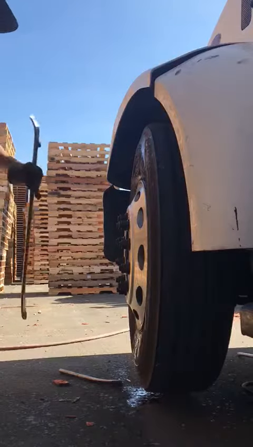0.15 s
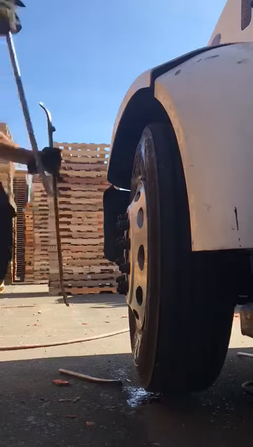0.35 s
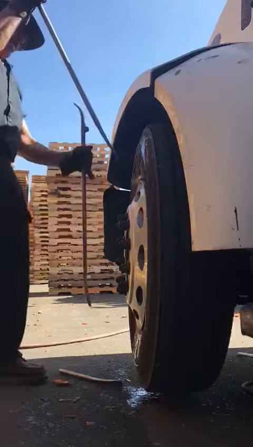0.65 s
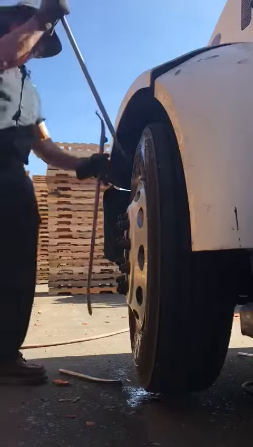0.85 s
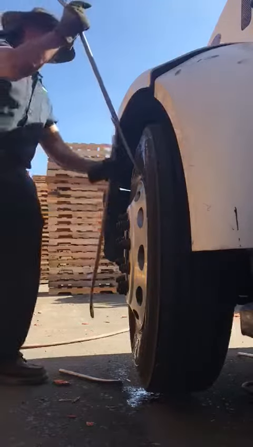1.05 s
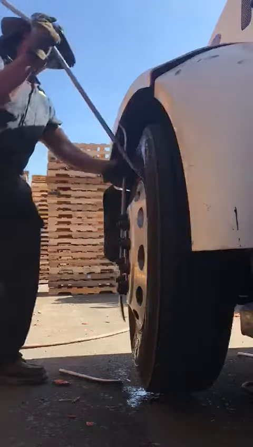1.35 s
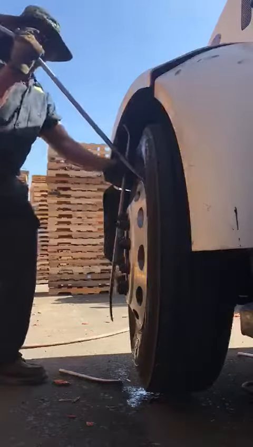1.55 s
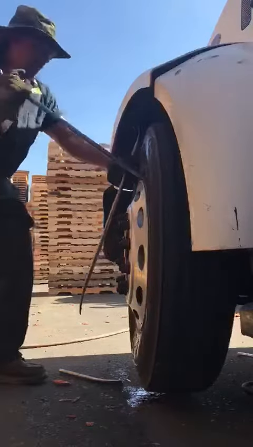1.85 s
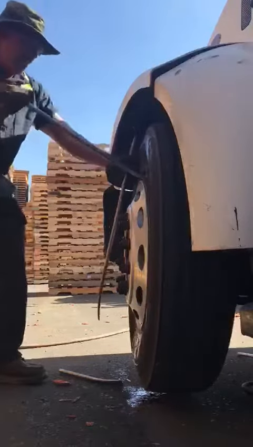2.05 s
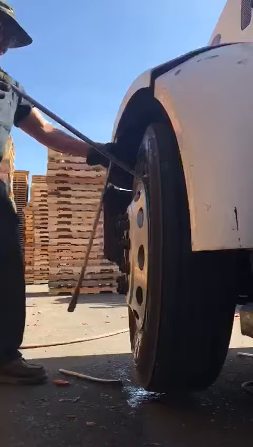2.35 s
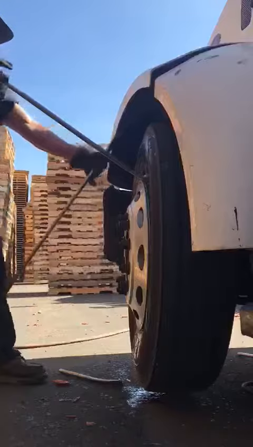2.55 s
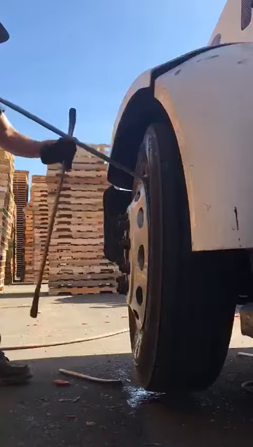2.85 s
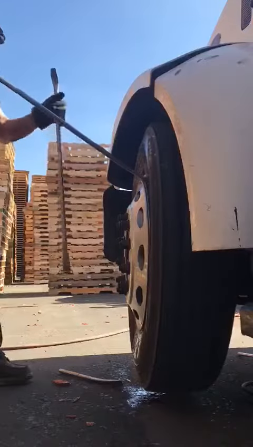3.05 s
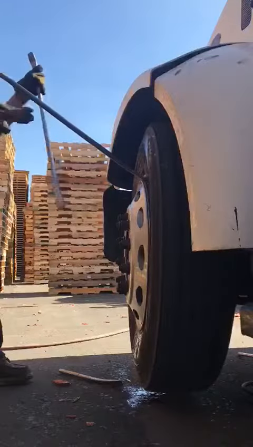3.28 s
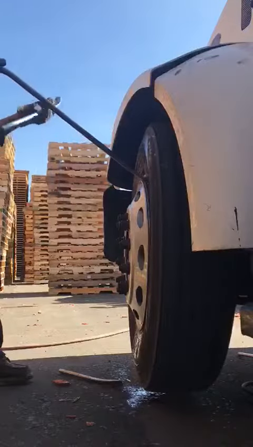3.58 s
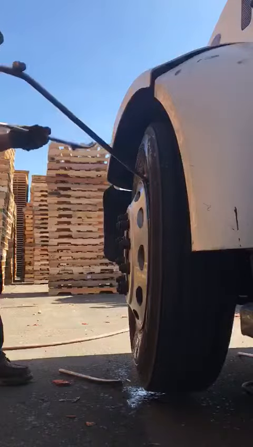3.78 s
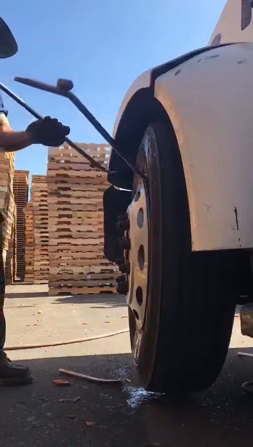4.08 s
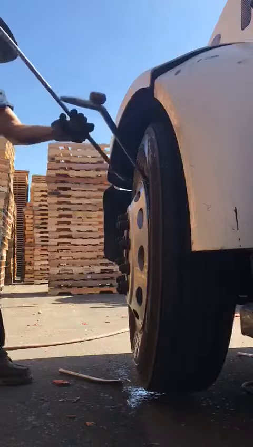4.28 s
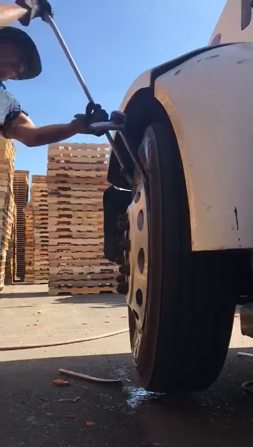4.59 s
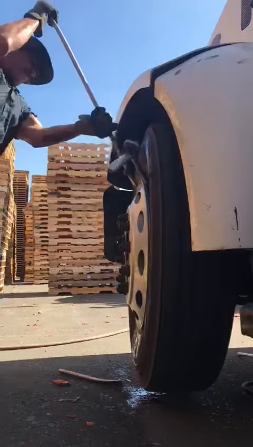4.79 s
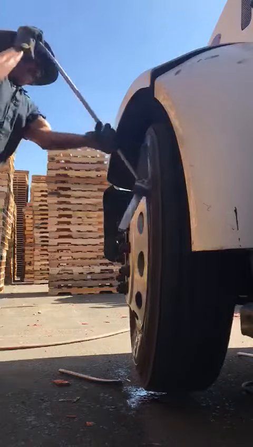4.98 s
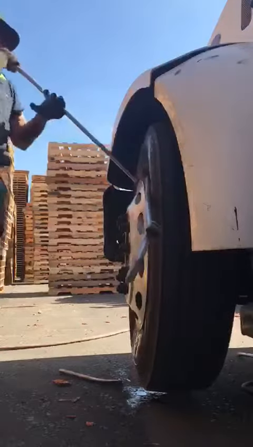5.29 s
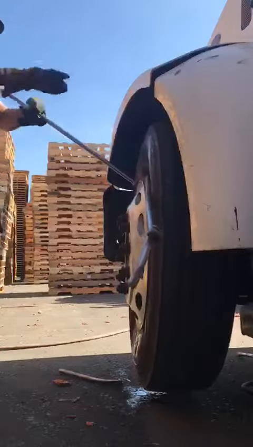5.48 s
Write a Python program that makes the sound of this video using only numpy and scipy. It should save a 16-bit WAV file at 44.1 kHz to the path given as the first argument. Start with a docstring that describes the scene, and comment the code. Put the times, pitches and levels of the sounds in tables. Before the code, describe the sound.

Steel bars slip and clank on a truck tyre's rim, with a loud rubbery boom as the bead pops, over low yard rumble.

```python
"""Workshop bay open to the yard: a truck tyre is levered off its rim with two long steel bars.
The rubber bead slips over the flange in jerks (shaped noise bursts) and the casing booms (ringing modes).
Bars clank on each other, a bar wedged in the rim is knocked (noise crash plus modes),
and bars scrape (friction driving resonances). Gloves slide and grit ticks (shaped noise);
a low rumble of steady noise fills the bay."""
import sys
import numpy as np
from scipy import signal
from scipy.io import wavfile

SR = 44100
rng = np.random.default_rng(int(sys.argv[2]) if len(sys.argv) > 2 else 0)


def log_audio(samples):
    """Write samples as a 16-bit WAV file to the path given in sys.argv[1]."""
    # one column per channel
    frames = np.atleast_2d(samples).T
    # limit to full scale, then quantise
    limited = np.clip(frames, -1, 1)
    pcm = np.round(limited * 32767).astype(np.int16)
    wavfile.write(sys.argv[1], SR, pcm)


N = 248249

# steady rumble of the yard: (frequency [Hz], density [dB per Hz, relative])
RUMBLE_SPECTRUM = [(13, -46), (22, -41), (49, -1.5), (70, -0.5), (87, -6), (202, -8), (422, -25),
                   (579, -29.5), (773, -33.5), (882, -34.5), (1900, -45.5), (4290, -55), (9220, -61),
                   (12000, -66.5), (15600, -106), (22000, -120)]
# gloves and sleeves: (frequency [Hz], density [dB per Hz, relative])
GLOVE_SPECTRUM = [(350, -34.5), (600, 5.5), (1040, -9), (1140, -3.5), (2180, -2.5), (5870, -5.5),
                  (9110, -8), (12000, -30.5), (15600, -65), (22000, -120)]
# steel sliding through gloves, sleeves swishing: (middle [s], level [dB], half length to 1/e [s])
SWISHES = [(0.091, -53, 0.0644), (0.303, -51.5, 0.0614), (.51, -56, 0.0447), (1.317, -56.5, 0.091),
           (1.884, -54, 0.081), (2.232, -60, 0.0613), (2.78, -62.5, 0.067), (3.073, -69, 0.027),
           (3.54, -63, 0.0856), (3.735, -56.5, 0.0596), (4.055, -60, .08), (4.3, -65, 0.45),
           (4.589, -59, 0.067), (5.28, -54, 0.0733), (5.522, -57.5, 0.181)]
# tips ticking, boots scuffing on grit: (time [s], level [dB], t60 [s])
TICKS = [(.236, -49.5, 0.374), (.282, -30, 0.0325), (.63, -46, 0.21), (0.65, -43, 0.076),
         (0.784, -42.5, 0.012), (.945, -27, 0.00586), (0.983, -49, 0.206), (1.041, -38.5, 0.062),
         (3.469, -48, 0.258), (5.499, -46, 0.197)]
# colour of ticks and scuffs: (frequency [Hz], density [dB per Hz, relative])
GRIT_SPECTRUM = [(150, 2), (600, -1), (1200, -7), (2200, -2.5), (5000, -3), (9000, -14.5), (12000, -8.5)]
# bar striking bar in single clanks: (time [s], level [dB], brightness [dB per octave], unused [s])
BAR_CLASHES = [(1.0425, -74.5, 8.5, 0), (1.174, -42, 4.5, 0), (4.4835, -27.5, -0.76, .021),
               (4.5065, -27.5, -0.35, .021), (4.5835, -45.5, -3.5, 0), (4.7945, -60.5, -4, 0)]
# wedged bar knocked: (time [s], level [dB], brightness [dB per octave], rattle length [s])
WEDGED_BAR_KNOCKS = [(1.532, -42, -28.5, 0), (1.981, -38, -9, 0.0197), (3.089, -40.5, -11, 0),
                     (3.165, -42.5, -20, 0.0097), (3.249, -49, -12, 0), (5.012, -30.5, -7, 0.0055),
                     (5.025, -26, 3, .1), (5.139, -39, -3.5, 0), (5.593, -32, -15, 0.014)]
# loaded flange pinging as the bar tip jumps: (time [s], level [dB], brightness [dB per octave])
PINGS = [(1.152, -45.5, 18.5), (1.173, -35, 17), (1.185, -16.5, -46.5), (1.983, -24.5, -10.5),
         (3.172, -41.5, -28.5)]
# ringing modes of the bar: (frequency [Hz], level [dB, relative], t60 [s])
BAR_MODES = [(917, 4.5, .09), (1077, -7, .08), (1538, 3, .12), (1730, -7, .15), (1968, 0, .12),
             (2155, -1, .09), (2416, -3, .15), (2681, -1, .1), (2807, -7, .12), (3683, -5, .11),
             (4110, -5, .14), (4718, -6, .13), (5631, -12, .15), (6304, -8, .11), (6490, -4, .11),
             (7442, -3, .13), (8177, -10, .1), (8769, -12, .1), (9173, -13, .11), (10230, -18, .1),
             (11160, -21, .09)]
# ringing modes of a bar wedged in the rim: (frequency [Hz], level [dB, relative], t60 [s])
WEDGED_BAR_MODES = [(882, -7, .16), (915, -5, .22), (990, -11, .3), (1517, 3, .17), (1563, 3, .17),
                    (1693, -11, .3), (1984, -4, .19), (2404, -7, .1), (2438, -3, .14), (2481, -1, .18),
                    (2977, -14, .2), (3099, -9, .1), (3137, 0, .12), (3208, -22, .9), (3325, -8, .14),
                    (3390, -11, .14), (3457, -5, .22), (3908, -3, .19), (4395, -18, .25), (4429, -7, .15),
                    (5050, -19, .15), (5792, -18, .15), (6613, -13, .16), (6800, -15, .15)]
# ringing modes of the flange: (frequency [Hz], level [dB, relative], t60 [s])
FLANGE_MODES = [(1990.7, -6.5, 0.176), (2480, -10, 0.27), (2611, -6, 0.152), (3620, -22.5, 0.26),
                (4223, -9.5, 0.0846), (6720, -18, 0.05), (8280, -22.5, 0.019)]
# dense overtones of steel: (frequency [Hz], density [dB per Hz, relative], t60 [s])
STEEL_OVERTONES = [(100, -24.5, 0.27), (360, -5, 0.141), (795, 5, 0.1266), (1200, -8, 0.217),
                   (1963, -0.5, 0.0713), (3200, -2, 0.201), (4700, -10.5, 0.16), (6700, -1.5, 0.0759),
                   (8920, -2, 0.0132), (11500, -21.5, 0.098)]
# bead slipping over the flange: (time [s], level [dB], brightness [dB per octave], build-up [s])
SLIPS = [(1.149, -27, 5, 0.00464), (1.17, -22.5, 17, 0.0024), (1.182, -20, -5.5, 0.0034),
         (1.284, -34.5, -6.5, .004), (1.328, -37, -3, 0.0088), (1.594, -24, -6, 0.00192),
         (2.249, -13.5, 3.5, 0.00325), (2.271, -26.5, 2, 0.0058), (2.318, -24.5, -5, 0.02),
         (2.398, -24, -0.44, 0.00676), (2.448, -45, 8, 0.00274), (2.558, -34.5, -3, 0.0487),
         (2.6, -25, -1, 0.0181), (2.768, -49.5, -1.5, .004)]
# bead popping free, a bright knock then a boom: (time [s], level [dB], brightness [dB per octave])
POPS = [(2.251, -35.5, 7), (2.267, -11.5, -1.5)]
# dense overtones of rubber: (frequency [Hz], density [dB per Hz, relative], t60 [s])
RUBBER_OVERTONES = [(78.7, -27, 0.1467), (201, -2, 0.566), (408, -2.5, 0.253), (708.3, 3, 0.2286),
                    (1130, -5, 0.2106), (2520, -5.5, 0.0983), (3860, -10, 0.1297), (7460, -21.5, 0.0676),
                    (11580, -40, 0.034)]
# ringing modes of the casing: (frequency [Hz], level [dB, relative], t60 [s])
CASING_MODES = [(74.5, -9, 1.1), (141, -7, .22), (157, 2, .45), (275, -12, .9), (367, -10, .6),
                (419, -16, .55), (487, -16, .6), (616, -10, .45), (712, -3, .22), (801, -13, .31),
                (1028, -21, .4), (1337, -21, .3)]
# bar dragged along the flange: (time [s], level [dB, before level_db of scrape()])
DRAG = [(1.74, -93.5), (1.764, -45), (1.866, -44.5), (1.878, -32), (1.932, -41.5), (1.96, -79.5)]
# broad resonances of the gripped bar: (frequency [Hz], level [dB, relative], t60 [s])
GRIPPED_RESONANCES = [(617.3, 4, 0.026), (893.5, 5.5, 0.088), (922, -4.5, 0.094), (1598, -2.5, 0.049),
                      (2495, -15.5, 0.113), (3345, -5.5, 0.032), (4570, -13, 0.031), (6194, 1, 0.01)]
# bar tip rasping under the bead: (time [s], level [dB, before level_db of scrape()])
RASP = [(5.35, -55.5), (5.356, -61.5), (5.414, -41), (5.558, -50.5), (5.58, -53.5)]
# resonances of the wedged bar as it rasps: (frequency [Hz], level [dB, relative], t60 [s])
RASP_RESONANCES = [(1087, -9.5, 0.065), (1680.4, 0, 0.082), (2276, 4, 0.031), (2640, 3, 0.024),
                   (2683, 11, 0.033), (3770, 5.5, 0.019), (4280, -7.5, 0.043), (6270, -2, 0.0089)]
# wheel rocking on its springs: (time [s], level [dB], brightness [dB per octave])
JOLTS = [(5.035, -21.5, 8), (5.145, -21.5, -34.5)]
# modes of the rocking wheel: (frequency [Hz], level [dB, relative], t60 [s])
WHEEL_MODES = [(48.19, -1.5, 0.744), (62.64, -12, 0.8), (84.7, 3.5, 0.099)]

TIME_S = np.arange(N) / SR
# half-octave noise bands
EDGES_HZ = 22 * 2 ** np.arange(0, 9.6, .5)
CENTRES_HZ = np.sqrt(EDGES_HZ[1:] * EDGES_HZ[:-1])

RUMBLE_DB, RUSTLE_DB = -36.5, -74
GRIT_DB_PER_OCTAVE = -1.5
# wavering of ringing modes
WAVER_DEPTH, WAVERS_PER_S = .55, 70
# each gap of a rattle over the one before; crash level per brightness (harder contacts crash more)
GAP_GROWTH, CRASH_DB_PER_DB_PER_OCTAVE = 1.6, 0.765
# casing kick re the slip; loss per brightness (duller slips kick harder)
BOOM_DB, BOOM_LOSS_DB_PER_DB_PER_OCTAVE = -11.5, .3
# softer, duller rub after each slip; level and brightness re the slip
SETTLE_DELAY_S, SETTLE_RISE_S, SETTLE_DB, SETTLE_DB_PER_OCTAVE = .025, .015, -20, -6
CUTOFF_HZ = 11700


def from_db(db):
    """Decibels to amplitude."""
    return 10 ** (np.asarray(db) / 20)


def rms_one(x):
    """Scale to rms 1."""
    return x / np.sqrt(np.mean(x ** 2) + 1e-20)


def level_curve(rows):
    """Gain in time from rows (time [s], level [dB]); silent outside them."""
    return from_db(np.interp(TIME_S, *np.transpose(rows), left=-200, right=-200))


def per_band(points, axis=1):
    """One column of a table over frequency, read at the band centres."""
    table = np.array(points)
    return np.interp(np.log(CENTRES_HZ), np.log(table[:, 0]), table[:, axis])


def noise_bands():
    """Half-octave bands of noise, rms 1 each; neighbours use separate noises."""
    white = rng.standard_normal((2, N))
    bands = []
    for k, edges_hz in enumerate(zip(EDGES_HZ, EDGES_HZ[1:])):
        band_pass = signal.butter(2, edges_hz, "band", fs=SR, output="sos")
        bands.append(rms_one(signal.sosfilt(band_pass, white[k % 2])))
    return np.array(bands)


def band_gains(spectrum, tilt=0):
    """Band gains for a spectrum tilted in dB per octave, total power 1."""
    density = from_db(per_band(spectrum) + tilt * np.log2(CENTRES_HZ))
    gains = density * np.sqrt(CENTRES_HZ)  # bandwidth grows with frequency
    return gains / np.linalg.norm(gains)


def burst(bands, start_s, gains, t60_s, rise_s):
    """Countless overtones swell and die, each band at its own pace; low bands take a cycle or so to build."""
    start, out = int(start_s * SR), np.zeros(N)
    length = min(int((np.max(t60_s) + rise_s) * SR), N - start)
    t = TIME_S[:length]
    build_s = np.reshape(rise_s + 1 / CENTRES_HZ, (-1, 1))
    decay = np.exp(-np.log(1000) * np.maximum(t - build_s, 0) / np.reshape(t60_s, (-1, 1)))
    shape = np.minimum(t / build_s, 1) * decay
    out[start:start + length] = gains @ (shape * bands[:, start:start + length])
    return out


def strike(hits, modes):
    """Hits (time, dB, tilt) pour energy into every mode; shifting contact makes each mode waver as it dies."""
    s, db, tilt = np.transpose(hits)[:3]
    lowest_hz, out = modes[0][0], np.zeros(N)
    steps_s = np.arange(0, N / SR + 1, 1 / WAVERS_PER_S)
    for hz, mode_db, t60_s in modes:
        blows = np.zeros(N)
        blows[(s * SR).astype(int)] = from_db(db + mode_db + tilt * np.log2(hz / lowest_hz)) ** 2
        loss = np.exp(-2 * np.log(1000) / (t60_s * SR))
        build = np.exp(-hz / SR)  # builds up in about a cycle
        energy = signal.lfilter([1 - build], [1, -loss - build, loss * build], blows + 1e-20)
        live = energy > 1e-10
        wander = rng.standard_normal((len(steps_s), 2)) @ [1, 1j]
        sway = 1 + WAVER_DEPTH * wander / np.sqrt(2)
        carrier = np.exp(2j * np.pi * (hz * TIME_S[live] + rng.random()))
        swing = np.interp(TIME_S[live], steps_s, sway) * carrier
        out[live] += np.sqrt(energy[live]) * swing.real
    return out


def yard_rumble():
    """Steady low-weighted noise."""
    return from_db(RUMBLE_DB) * (band_gains(RUMBLE_SPECTRUM) @ noise_bands())


def gloves(bands):
    """Sliding hiss swells and fades with each stroke, over a constant rustle of clothes."""
    sliding = from_db(RUSTLE_DB)
    for middle_s, db, half_s in SWISHES:
        sliding = sliding + from_db(db) * np.exp(-((TIME_S - middle_s) / half_s) ** 2)
    return sliding * (band_gains(GLOVE_SPECTRUM) @ bands)


def ticks_and_scuffs(bands):
    """Dry contacts on grit: noise bursts of one colour, each with its own decay."""
    gains = band_gains(GRIT_SPECTRUM, GRIT_DB_PER_OCTAVE)
    return sum(burst(bands, s, from_db(db) * gains, t60_s, 0) for s, db, t60_s in TICKS)


def contact(s, db, tilt, crash_db):
    """One contact (time, dB, tilt, crash dB); crash_db is the crash re the ring at zero tilt."""
    return s, db, tilt, db + crash_db + CRASH_DB_PER_DB_PER_OCTAVE * tilt


def rattle(blows, first_gap_s, fade_db_per_s, dulling_db_per_octave_per_s, crash_db):
    """Contacts at growing gaps, ever softer and duller, within each blow's rattle length."""
    gaps_s = first_gap_s * GAP_GROWTH ** np.arange(8)
    delays_s = np.concatenate([[0], np.cumsum(gaps_s)])
    contacts = []
    for s, blow_db, blow_tilt, length_s in blows:
        for delay_s in delays_s[delays_s <= length_s]:
            db = blow_db - fade_db_per_s * delay_s
            tilt = blow_tilt - dulling_db_per_octave_per_s * delay_s
            contacts.append(contact(s + delay_s, db, tilt, crash_db))
    return contacts


def clanks(bands):
    """Steel on steel: a short crash of overtones and ringing modes, damped by hands and rubber."""
    on_bar = [contact(s, db, tilt, crash_db=1) for s, db, tilt, _ in BAR_CLASHES]
    on_wedged_bar = rattle(WEDGED_BAR_KNOCKS, first_gap_s=.0051, fade_db_per_s=23.4,
                           dulling_db_per_octave_per_s=195, crash_db=1.56)
    t60_s = per_band(STEEL_OVERTONES, axis=2)
    crash = np.zeros(N)
    for s, _, tilt, crash_db in on_wedged_bar + on_bar:
        gains = from_db(crash_db) * band_gains(STEEL_OVERTONES, tilt / 2)
        crash += burst(bands, s, gains, t60_s, 0)
    rings = strike(on_wedged_bar, WEDGED_BAR_MODES) + strike(on_bar, BAR_MODES)
    return crash + rings + strike(PINGS, FLANGE_MODES)


def tyre(bands):
    """Each slip is a rough bark of rubber, settles with a softer rub and kicks the casing and its air."""
    settles, kicks = [], []
    for s, db, tilt, rise_s in SLIPS:
        settles.append((s + SETTLE_DELAY_S, db + SETTLE_DB, tilt + SETTLE_DB_PER_OCTAVE, SETTLE_RISE_S))
        kicks.append((s + rise_s, db + BOOM_DB - BOOM_LOSS_DB_PER_DB_PER_OCTAVE * tilt, 0))
    t60_s = per_band(RUBBER_OVERTONES, axis=2)
    bark = np.zeros(N)
    for s, db, tilt, rise_s in list(SLIPS) + settles:
        bark += burst(bands, s, from_db(db) * band_gains(RUBBER_OVERTONES, tilt), t60_s, rise_s)
    return bark + strike(kicks + list(POPS), CASING_MODES)


def friction(catches_per_s, spread_db):
    """Tiny catches of uneven size and either sign at random moments."""
    sizes = from_db(spread_db * np.minimum(rng.exponential(1, N), 4)) * rng.choice([-1, 1], N)
    return sizes * (rng.random(N) < catches_per_s / SR)


def ring(force, hz, t60_s):
    """Two-pole resonator: a unit click sets a sine of height 1 ringing."""
    r, w = from_db(-60 / (t60_s * SR)), 2 * np.pi * hz / SR
    return signal.lfilter([0, np.sin(w)], [1, -2 * r * np.cos(w), r * r], force + 1e-18)


def scrape(stroke, modes, level_db, catches_per_s, grit_db):
    """Friction excites the bar's resonances along the stroke and is also heard directly as grit."""
    force = friction(catches_per_s, spread_db=-3.5)
    rings = rms_one(sum(from_db(db) * ring(force, hz, t60_s) for hz, db, t60_s in modes))
    grit = from_db(grit_db) * rms_one(force)
    return from_db(level_db) * level_curve(stroke) * (rings + grit)


def wheel_jolts():
    """The wheel rocks on its springs: jolts ring its low modes."""
    return strike(JOLTS, WHEEL_MODES)


def reflections(x, t60_s, delay_s, dull_hz):
    """Diffuse echoes: decaying noise that starts after a delay, dulled by the surfaces."""
    t = TIME_S[:SR]
    tail = rng.standard_normal(SR) * np.exp(-np.log(1000) * t / t60_s) * (t > delay_s)
    tail /= np.linalg.norm(tail)
    tail = signal.sosfilt(signal.butter(1, dull_hz, fs=SR, output="sos"), tail)
    return signal.fftconvolve(x, tail)[:N]


def scene():
    """Work at the wheel, its echoes in wheel arch and bay, jolts and rumble; both channels alike."""
    bands = noise_bands()
    work = gloves(bands) + ticks_and_scuffs(bands) + clanks(bands) + tyre(bands)
    work += scrape(DRAG, GRIPPED_RESONANCES, level_db=-1.5, catches_per_s=4500, grit_db=-17.5)
    work += scrape(RASP, RASP_RESONANCES, level_db=-5.0, catches_per_s=910, grit_db=-21.5)
    wheel_arch = from_db(-7) * reflections(work, t60_s=0.0592, delay_s=0.0009, dull_hz=8150)
    bay = from_db(-14.5) * reflections(work, t60_s=0.533, delay_s=0.015, dull_hz=2538)
    mono = work + wheel_arch + bay + yard_rumble() + wheel_jolts()
    return np.array([mono, mono])


def record(dry):
    """The microphone loses the deepest bass, the loudest peaks are rounded and the top is cut."""
    heard = signal.sosfilt(signal.butter(3, 30, "high", fs=SR, output="sos"), dry)
    rounded = 0.9157 * np.tanh(heard / 0.8698)
    return signal.sosfilt(signal.ellip(10, .2, 80, CUTOFF_HZ, fs=SR, output="sos"), rounded)


dry = scene()
out = record(dry)
log_audio(out)
```